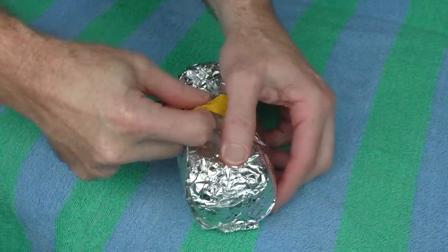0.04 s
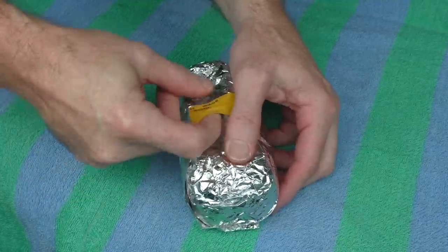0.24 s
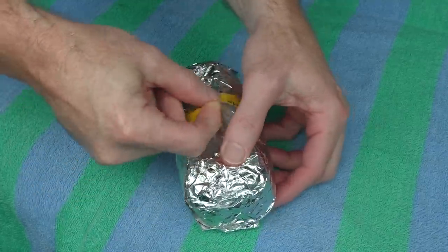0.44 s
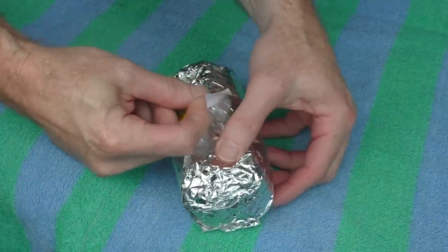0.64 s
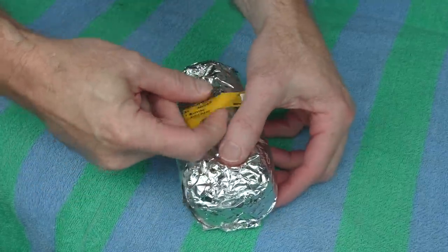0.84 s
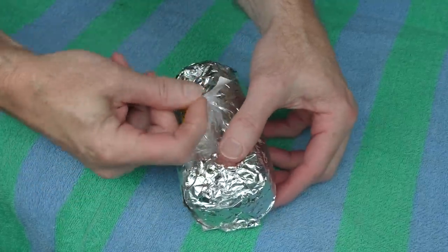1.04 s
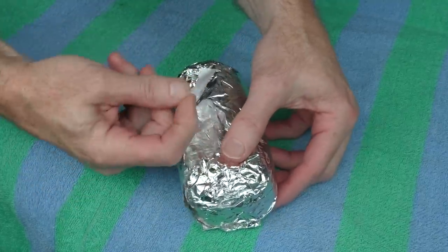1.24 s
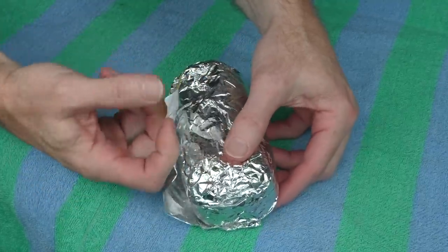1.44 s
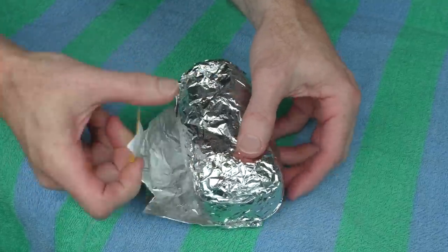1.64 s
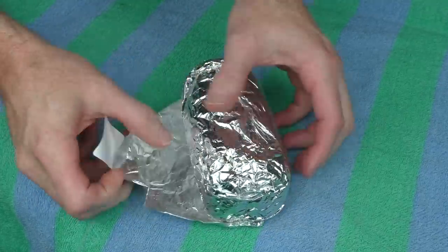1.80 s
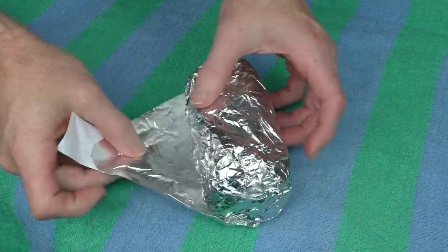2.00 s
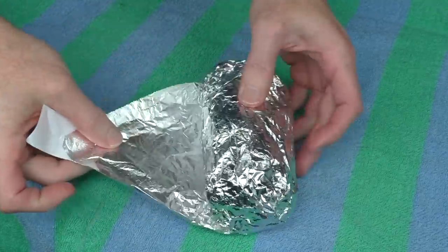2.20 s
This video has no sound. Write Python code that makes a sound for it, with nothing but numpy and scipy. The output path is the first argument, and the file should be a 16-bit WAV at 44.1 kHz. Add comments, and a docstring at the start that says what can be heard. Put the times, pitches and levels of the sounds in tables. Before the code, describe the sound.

Close, bright foil crinkles and snaps in irregular bursts while a small foil-wrapped parcel is opened

```python
"""Peeling and opening a foil parcel

Hands peel a paper sticker off a foil-wrapped parcel of food and pull the foil open, on a cloth, up close.
Each buckling crease is a sharp noise crack plus a dense, decaying shimmer; flipping facets add pitched pops.
Random ticks make fine crinkle and dull rustle; the parcel's faint ring is a sum of decaying sines.
A small room adds a short noise tail, low rumble, faint hiss and hum."""
import sys
import numpy as np
from scipy import signal
from scipy.fft import rfft, irfft, next_fast_len
from scipy.io import wavfile
from scipy.ndimage import map_coordinates

SR = 44100
rng = np.random.default_rng(int(sys.argv[2]) if len(sys.argv) > 2 else 0)


def output_pcm(signal):
    """Save a mono or channel-first signal as 16-bit PCM at the path in sys.argv[1].

    Samples are clipped to [-1, 1] before scaling.
    """
    pcm = np.clip(np.atleast_2d(signal).T, -1, 1) * 32767
    wavfile.write(sys.argv[1], SR, np.round(pcm).astype(np.int16))


N = 99621
EVENT_SAMPLES = 8192


def amp(db):
    """Decibels to gain."""
    return 10 ** (np.asarray(db) / 20)


def unit(x):
    """x at rms 1."""
    return x / np.sqrt(np.mean(x ** 2) + 1e-20)


def along(points, hz):
    """(Hz, value) points interpolated on a log frequency axis."""
    point_hz, value = np.transpose(points)
    return np.interp(np.log(hz + 1), np.log(point_hz + 1), value)


def fade(t, t60_s):
    """Exponential decay, 60 dB in t60_s."""
    return np.exp(-np.log(1000) * t / t60_s)


def rise(t, rise_s):
    """Exponential approach to 1 with time constant rise_s."""
    return 1 - np.exp(-t / rise_s)


def wobble(knots_per_s):
    """Smooth random curve through normally distributed knots."""
    knots = rng.standard_normal(int(N * knots_per_s / SR) + 4)
    return map_coordinates(knots, [np.arange(N) * knots_per_s / SR])


def filtered(x, response):
    """x through a gain given as a function of frequency."""
    size = next_fast_len(N + SR // 2)
    spectrum = rfft(x, size) * response(np.fft.rfftfreq(size, 1 / SR))
    return irfft(spectrum, size)[..., :N]


def causal(gain):
    """Minimum-phase response with this gain, by folding the cepstrum."""
    cepstrum = irfft(np.log(gain))
    half = len(cepstrum) // 2
    cepstrum[1:half] *= 2
    cepstrum[half + 1:] = 0
    return np.exp(rfft(cepstrum))


def spread(pair, side_db):
    """Left and right from two unrelated signals; the middle has energy 1."""
    mid, side = pair / np.linalg.norm(pair, axis=1, keepdims=True)
    side = amp(side_db) * side
    return np.array([mid + side, mid - side])


# Hum partials: pitch_hz, level_db (before the bass level curve)
HUM_PARTIALS = [(79, -59.5), (160, -68), (334, -63)]
HUM_WAVER_DB, HUM_DRIFT_RAD = 1.2, 0.48


def hum():
    """Steady low partials, each wavering slightly in level and phase."""
    t = np.arange(N) / SR
    total = np.zeros(N)
    for pitch_hz, level_db in HUM_PARTIALS:
        waver = amp(HUM_WAVER_DB * wobble(17.0))
        phase = 2 * np.pi * pitch_hz * t + HUM_DRIFT_RAD * wobble(7.13)
        total += amp(level_db) * unit(waver * np.sin(phase))
    return total


# Room noise spectrum: freq_hz, relative_level_db
FLOOR_SPECTRUM = [(15, -0.5), (28, -17), (41, 6.5), (58, -7), (82, 5), (125, -5.5), (170, -6.5),
                  (260, -5.5), (340, -12), (450, -15.5), (620, -22), (850, -22), (1100, -15.5),
                  (1800, -17.5), (2200, -21), (3000, -28), (4200, -51), (9000, -39), (16000, -34.5)]
# Room noise width: freq_hz, side_gain_db
FLOOR_WIDTH = [(40, -17), (120, -15.5), (300, -9), (1000, -8), (8000, -4)]
# Level of rumble and hum below BASS_HZ: time_s, gain_db
BASS_LEVEL = [(0, -0.3), (1.35, -2), (1.56, 1.5)]
FLOOR_DB, BASS_HZ = -49, 200


def floor():
    """Shaped noise and hum; the rumble and hum sink slightly, then rise a little from about 1.4 s."""
    noise = rng.standard_normal((2, N))
    mid, side = filtered(noise, lambda hz: amp(along(FLOOR_SPECTRUM, hz)))
    side = filtered(side, lambda hz: amp(along(FLOOR_WIDTH, hz)))
    air = amp(FLOOR_DB) * unit(np.array([mid + side, mid - side])) + hum()
    bass = filtered(air, lambda hz: 1 / (1 + (hz / BASS_HZ) ** 4))
    bass_gain = amp(np.interp(np.arange(N) / SR, *np.transpose(BASS_LEVEL)))
    return air - bass + bass_gain * bass


ROOM_T60_S, ROOM_RISE_S, ROOM_DB = 0.46, 0.0056, -27.5


def room(x):
    """Faint, short reverberation: convolution with decaying stereo noise."""
    t = np.arange(SR // 2) / SR
    noise = rng.standard_normal((2, len(t)))
    tail = spread(noise * fade(t, ROOM_T60_S) * rise(t, ROOM_RISE_S), side_db=-7)
    return amp(ROOM_DB) * signal.fftconvolve(x, tail, axes=1)[:, :N]


# Resonances of the wrapped parcel: pitch_hz, relative_level_db
PARCEL_MODES = [(2505, -15), (2681, 11), (2905, -14), (3011, 1), (3321, 6), (3518, 15), (4713, 13),
                (6235, -23), (7200, 13.5), (12210, 1)]
PARCEL_T60_S, PARCEL_DB = 0.075, -43


def parcel(x):
    """The parcel's resonances ring briefly with every foil sound."""
    t = np.arange(EVENT_SAMPLES) / SR
    modes = sum(amp(level_db) * np.sin(2 * np.pi * pitch_hz * t) for pitch_hz, level_db in PARCEL_MODES)
    ring = fade(t, PARCEL_T60_S) * modes / len(PARCEL_MODES)
    return amp(PARCEL_DB) * signal.fftconvolve(x, ring[None], axes=1)[:, :N]


MOTTLE_DB, MOTTLE_STEP_HZ = 3.0, 653.7  # depth and spacing of peaks and dips


def mottle(hz):
    """Random peaks and dips of one facet's spectrum, in dB."""
    knots_db = MOTTLE_DB * rng.standard_normal(EVENT_SAMPLES // 16)
    return map_coordinates(knots_db, [hz / MOTTLE_STEP_HZ], mode="reflect")


SHIMMER_RISE_S, SHIMMER_T60_S, SHIMMER_SIDE_DB = 0.0021, 0.039, -8
GRAIN_DB, GRAIN_PER_S = 2, 1600


def shimmer():
    """Bending waves scatter through the crumpled sheet: a new dense, grainy noise decay each time."""
    t = np.arange(EVENT_SAMPLES) / SR
    envelope = rise(t, SHIMMER_RISE_S) * fade(t, SHIMMER_T60_S)
    knots = rng.standard_normal(EVENT_SAMPLES)
    grain = np.interp(t * GRAIN_PER_S, np.arange(EVENT_SAMPLES), knots)
    return envelope * amp(GRAIN_DB * grain) * rng.standard_normal((2, EVENT_SAMPLES))


TICK_DIRECT = 0.9  # impulse added ahead of each tick's shimmer


def crackle(ticks_per_s, spread_db, spectrum, facets=14):
    """Many tiny buckles of random size, shared among the facets; rms 1."""
    out = np.zeros((2, N))
    hz = np.fft.rfftfreq(EVENT_SAMPLES, 1 / SR)
    for _ in range(facets):
        struck = rng.random(N) < ticks_per_s / facets / SR
        size_db = spread_db * np.clip(rng.standard_normal(N), -2, 2)
        ticks = struck * amp(size_db)
        facet = spread(shimmer(), SHIMMER_SIDE_DB)
        facet[:, 0] += TICK_DIRECT
        facet = irfft(rfft(facet) * causal(amp(2 * mottle(hz))))
        facet /= np.linalg.norm(facet)
        out += signal.fftconvolve(ticks[None], facet, axes=1)[:, :N]
    return unit(filtered(out, lambda hz: amp(along(spectrum, hz))))


# Dull rustle spectrum: freq_hz, relative_level_db
RUSTLE_SPECTRUM = [(60, -34), (165, 11.5), (300, -2), (500, -11), (850, -13.5), (1100, 1.5), (1800, 2),
                   (2300, -1.5), (3200, -1), (4200, -4), (9000, -16), (16000, -27)]


def rustle():
    """Duller ticks of the loose sheet under the fingers."""
    return amp(-1.5) * crackle(ticks_per_s=400, spread_db=4.5, spectrum=RUSTLE_SPECTRUM)


# Fine crinkle spectrum: freq_hz, relative_level_db
CRINKLE_SPECTRUM = [(300, -40), (1200, -20.5), (3000, 6), (4500, -3), (9000, 4), (13000, 0.5), (15800, -5)]


def crinkle():
    """Fine, bright ticks of foil and peeling glue."""
    return amp(-2.5) * crackle(ticks_per_s=360, spread_db=4, spectrum=CRINKLE_SPECTRUM)


# Hand activity: time_s, crinkle_gain_db, rustle_gain_db
HANDLING_LEVELS = [(0, -31, -59), (.07, -57, -53.5), (.17, -56, -57), (0.226, -39.5, -52),
                   (.255, -52.5, -64.5), (.38, -61, -47.5), (.51, -57.5, -57), (.75, -61, -55),
                   (0.778, -47.5, -77), (0.822, -40, -55), (.86, -73, -53), (0.896, -34, -41),
                   (.95, -67, -61), (1.005, -53, -46.5), (1.016, -29, -66), (1.06, -37, -55),
                   (1.092, -40, -75), (1.115, -57, -55), (1.213, -50.5, -55), (1.24, -32, -44),
                   (1.29, -45.5, -61), (1.43, -66.5, -58), (1.468, -40, -55), (1.511, -46, -48),
                   (1.535, -66, -62), (1.588, -49.5, -48.5), (1.62, -60, -53.5), (1.71, -54, -49.5),
                   (1.83, -63, -57), (1.911, -43.5, -44.5), (2.02, -44, -46), (2.05, -51, -51),
                   (2.09, -46, -39), (2.13, -40, -46), (2.2, -48, -50.5)]


def handling():
    """Crinkle and rustle, each following the hands through its own level curve."""
    time_s, crinkle_db, rustle_db = np.transpose(HANDLING_LEVELS)
    t = np.arange(N) / SR
    fine = amp(np.interp(t, time_s, crinkle_db)) * crinkle()
    dull = amp(np.interp(t, time_s, rustle_db)) * rustle()
    return fine + dull


# Foil colour shared by all snaps: freq_hz, relative_level_db
FOIL_SPECTRUM = [(100, -8), (300, -10.5), (520, -12.5), (720, -12), (870, -18.5), (1050, -3.5), (1350, -8),
                 (1700, -2), (2200, -2.5), (3100, 4), (3900, 0.5), (5200, 0.5), (7500, 2.5), (10000, 5),
                 (13000, 3.5), (15500, -6), (16500, -22)]


def foil_db(hz):
    """The sheet's common spectrum, in dB."""
    return along(FOIL_SPECTRUM, hz)


# Wider facets flipping over: start_s, pitch_hz, relative_energy_db, t60_s
POP_EVENTS = [(.0076, 2500, -14, 0.0081), (0.2037, 2700, -19, 0.0062), (0.3651, 3110, -9, 0.006),
              (0.3657, 1040, -21, 0.0027), (.529, 3280, -7, 0.0052), (.559, 2960, -17, 0.011),
              (.5876, 1770, -27.5, 0.0076), (1.0203, 3010, -0.5, 0.0034), (1.0221, 1480, -16, 0.016),
              (1.0376, 3500, -2.5, 0.0041), (1.054, 1420, -13.5, 0.028), (1.2468, 2850, -7, 0.0036),
              (1.252, 2940, -11.5, 0.0082), (1.2876, 555, -27.5, 0.005), (1.6848, 1480, -17, 0.0088),
              (1.765, 1555, -14.5, 0.012), (1.8711, 1690, -15, 0.029), (1.885, 1650, -21, 0.019),
              (1.947, 1710, -20, 0.016), (1.997, 1660, -20, 0.027), (2.0644, 2520, -16, 0.011),
              (2.1532, 1144, -8, 0.0086), (2.154, 480, -16, 0.0062), (2.1845, 1560, -15.5, 0.01)]
POP_RISE_S, POP_SCATTER_DB = 0.00068, -9


def pops():
    """A flipping facet rings for a few cycles and scatters into the sheet, with the foil's dip near 850 Hz."""
    out = np.zeros((2, N + EVENT_SAMPLES))
    t = np.arange(EVENT_SAMPLES) / SR
    for start_s, pitch_hz, energy_db, t60_s in POP_EVENTS:
        ring = rise(t, POP_RISE_S) * fade(t, t60_s) * np.sin(2 * np.pi * pitch_hz * t)
        scattered = signal.fftconvolve(shimmer(), ring[None], axes=1)[:, :EVENT_SAMPLES]
        scattered = spread(scattered, side_db=-3.5)
        pop = ring / np.linalg.norm(ring) + amp(POP_SCATTER_DB) * scattered
        start = max(round(start_s * SR), 0)
        out[:, start:start + EVENT_SAMPLES] += amp(energy_db) * pop
    # cut only where the foil is weaker than at 520 Hz
    return filtered(out[:, :N], lambda hz: amp(np.minimum(foil_db(hz) - foil_db(520), 0)))


# Buckling creases: start_s, relative_energy_db, crack_over_shimmer_db,
# then colour against 5.6 kHz: at_1500_hz_db, at_3000_hz_db, at_11000_hz_db
SNAP_EVENTS = [(0.0005, -6, -1, -7, -3, -15), (0.0076, -14.5, 1, 6, 3, -13),
               (0.0276, -12, -13, 7.5, 11, -6.5), (0.0317, -15.5, 1, 0, -3, -9),
               (0.0487, -14, -7, -2, -1, -2), (0.1056, -21, -15, -2, -3, -9), (0.126, -16, -3, 5, -6, 3),
               (0.2048, -14.5, -1, 4, 8, 2), (0.2145, -18, -11, -15, -3, -8),
               (0.3655, -5.5, -6.5, 9, 6.5, -0.5), (0.3774, -12.5, -15, -18, 5, -1),
               (0.4716, -11, -3.5, -5, -2, -1.5), (0.5284, 0, -3.5, -3.5, -3, -20.5),
               (0.556, -20, -10, 2, 13, -4), (0.563, -16.5, 0, -3, 2, -17), (0.5871, -20.5, -9, 16, 7, 2),
               (0.614, -23, 8, 0, 20, -18), (0.6691, -21.5, 3, 12, 10, 0.5), (0.803, -15, -8, 0, -13, 12),
               (0.8258, 3, -1, -3.5, -2.5, 1), (0.831, -7.5, -7, -19, 5, -19), (0.8684, -18, 3, -1, 6, 0),
               (0.8823, -6.5, -3, -29, -1, -6.5), (0.9259, -18, -10, 6, 0, -4),
               (0.9745, -14, 2, -24, -1, 3), (1.0186, -3.5, -1, -0.5, 10, 10), (1.022, 4.5, 0, -22, 12, -7),
               (1.0355, 0.5, -3, 0, 4, -6), (1.0534, -3, 1, 5, 5, -21), (1.066, -13.5, -3, -16, 2, -5),
               (1.0781, -9.5, -17, -29, -3, -11), (1.0851, -13, -5, -6, 3, -8),
               (1.0902, -13, -3, -18, -23, -8), (1.154, -19.5, -5, 9, 4, -12),
               (1.1958, -13.5, -6, 2, 6, -7.5), (1.2372, -4.5, -4, -4, 5, 1.5), (1.243, -10, 6, -20, 6, 9),
               (1.247, -2, 5.5, -12.5, -7, -8), (1.2505, -2, -12, -5.5, -7, -8),
               (1.2528, -2.5, 3, -6, -1, 4), (1.2873, 4, -1, -0.5, 1.5, -2.5),
               (1.3153, -15.5, -6, -19, -1, -1), (1.3292, 7.5, 6, 3.5, 2, 2.5),
               (1.4702, -18.5, 0, -6, 5, -2), (1.4796, -11, -1, -18, -15, 2.5),
               (1.6266, -17, -1, 0, -1.5, -4.5), (1.686, -9, 0, 10.5, 1, -6.5),
               (1.7002, -24, 10, 12, -5, -24), (1.7652, -8.5, -3, 8.5, 14.5, 2),
               (1.8692, -7.5, 2.5, 12.5, 1.5, -1.5), (1.9019, -11.5, -6, 11, -2, -11),
               (1.907, -10.5, -4, 15.5, -6, -17), (1.9145, -1, 4.5, 2, -0.5, -3),
               (1.934, -6.5, 4, -3, -2, -9), (1.9465, -16, -9, 7, 3, -6), (1.9808, -1, -9.5, 3, 0.5, -3.5),
               (1.997, -10.5, 5, 14, 14, -10), (2.001, -7.5, -1, -5, 0, 1), (2.0054, -7, 11, 2, 1, 1),
               (2.018, -13.5, 1, 8, 8, -1), (2.0272, -18, -1, 12, 0, -11),
               (2.0335, -14.5, -3, -20, -16, -13), (2.0603, -15, 0, -2, 9, -2),
               (2.0644, -6, -4, 11.5, 6, -11), (2.073, -7.5, 2, 8, 2, -6), (2.0759, -15, 2, 9, 4, -3),
               (2.0876, -15.5, -5, 13, -23, -22), (2.1167, -13, -14, 0, 4, -27),
               (2.1526, 0.5, 0.5, 3.5, -1.5, -10.5), (2.1835, -14.5, 2, 26, 18, -1)]
# Frequencies of the colour points, the third being the reference: freq_hz
COLOUR_POINTS_HZ = [1500, 3000, 5600, 11000]
CRACK_RISE_S, CRACK_T60_S = 0.00015, 0.0016  # noise envelope before its spectrum is evened
CRACK_SIDE_DB, SNAP_DB = -14.5, -1


def snaps():
    """Each crease buckles with a crack and a shimmer, both in the colour of its own facet."""
    out = np.zeros((2, N + EVENT_SAMPLES))
    t = np.arange(EVENT_SAMPLES) / SR
    hz = np.fft.rfftfreq(EVENT_SAMPLES, 1 / SR)
    for start_s, energy_db, crack_db, low_db, ring_db, treble_db in SNAP_EVENTS:
        tilt = list(zip(COLOUR_POINTS_HZ, [low_db, ring_db, 0, treble_db]))
        mottle_db = mottle(hz) * np.minimum(hz / COLOUR_POINTS_HZ[2], 1)
        facet = causal(amp(foil_db(hz) + along(tilt, hz) + mottle_db))

        noise = rng.standard_normal((2, EVENT_SAMPLES))
        burst = rfft(rise(t, CRACK_RISE_S) * fade(t, CRACK_T60_S) * noise)
        even_burst = burst / np.sqrt(np.abs(burst) + 1e-6)  # halves its spectral unevenness in dB
        crack = spread(irfft(even_burst * facet), CRACK_SIDE_DB)
        crack *= t < t[-1] / 2  # drops what wraps round to the end
        sheet = spread(irfft(rfft(shimmer()) * facet), SHIMMER_SIDE_DB)

        snap = (amp(crack_db) * crack + sheet) / np.hypot(1, amp(crack_db))
        start = max(round(start_s * SR), 0)
        out[:, start:start + EVENT_SAMPLES] += amp(energy_db + SNAP_DB) * snap
    return out[:, :N]


# Stereo width of the foil: freq_hz, side_gain_db
FOIL_WIDTH = [(300, -4.5), (1300, 3.5), (3000, 3), (5600, -2.5), (9500, -6), (14000, 5)]


def widened(x):
    """The sheet radiates some bands more widely than others."""
    mid = (x[0] + x[1]) / 2
    side = filtered((x[0] - x[1]) / 2, lambda hz: amp(along(FOIL_WIDTH, hz)))
    return np.array([mid + side, mid - side])


def scene():
    """The foil, the parcel's ring and the room."""
    foil = widened(handling() + pops() + snaps())
    foil = foil + parcel(foil)
    return floor() + room(foil) + foil


# Microphone mismatch: freq_hz, left_over_right_db
MIC_BALANCE = [(100, -0.5), (1000, -0.6), (5000, .5), (9000, 0.1), (13000, 1.7)]
TOP_HZ = 16000


def record(dry):
    """Two slightly different microphones, with a steep cut above TOP_HZ."""
    def response(hz):
        balance = amp(np.outer([0.5, -0.5], along(MIC_BALANCE, hz)))
        return balance / np.sqrt(1 + (hz / TOP_HZ) ** 120)
    return filtered(dry, response)


dry = scene()
out = record(dry)
output_pcm(out)
```